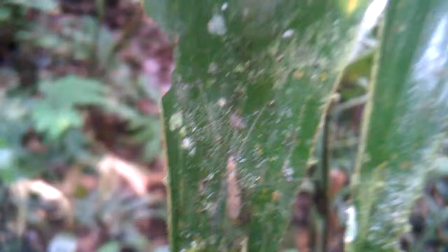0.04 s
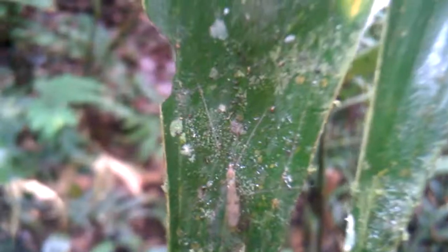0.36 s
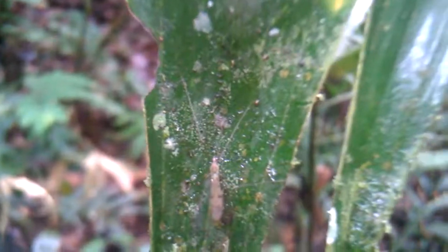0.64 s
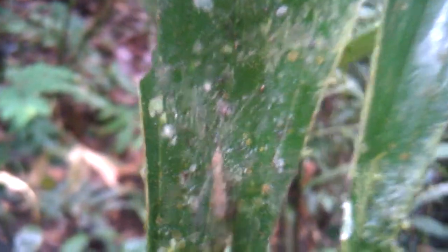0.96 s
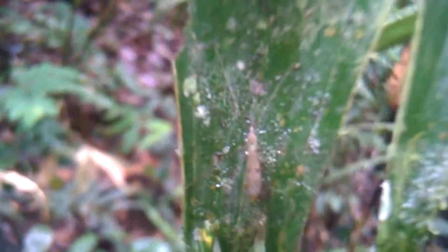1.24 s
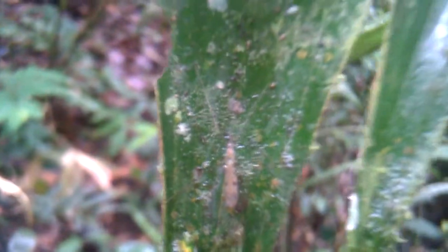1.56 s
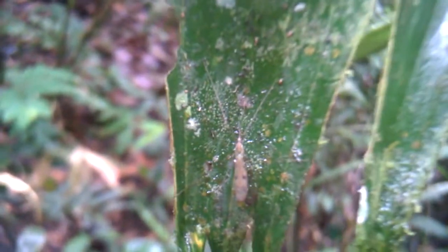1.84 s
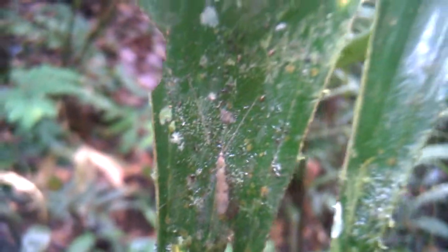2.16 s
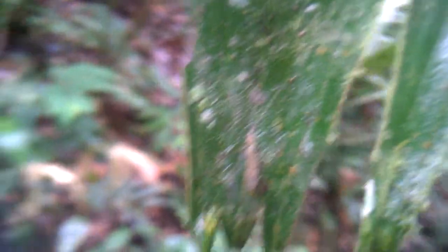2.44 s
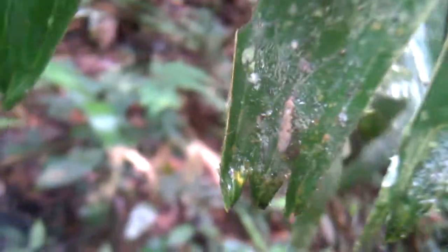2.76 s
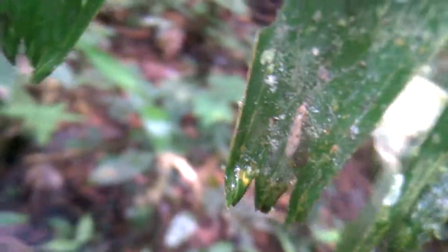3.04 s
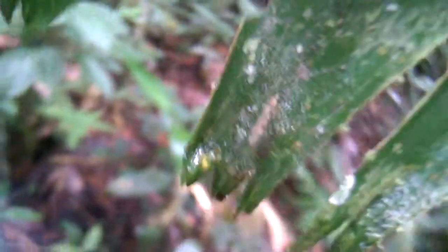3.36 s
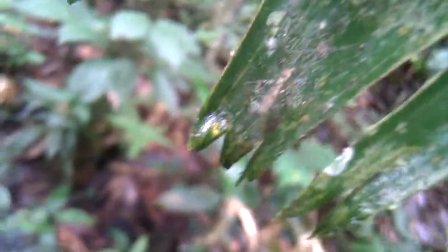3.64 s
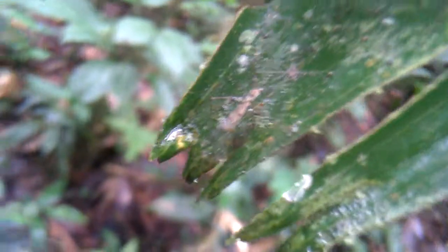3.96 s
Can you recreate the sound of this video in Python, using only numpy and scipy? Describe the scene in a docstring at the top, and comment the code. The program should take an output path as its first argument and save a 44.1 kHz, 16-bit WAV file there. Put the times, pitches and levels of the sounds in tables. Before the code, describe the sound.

Quiet forest ambience with low rumble, distant engine hum, faint insects and brief handling noises.

```python
"""Quiet forest floor, hand-held camera

A far engine hums over low rumble and a soft wash of air. Distant insects hold a shrill band
while one chirps at an even pace. Up close, the camera's plastic case rings with a single click;
later, fingers tap, rub and scrape it in puffs of stick-slip friction."""
import sys
import numpy as np
from scipy import signal
from scipy.fft import rfft, irfft
from scipy.io import wavfile

SR = 44100
rng = np.random.default_rng(int(sys.argv[2]) if len(sys.argv) > 2 else 0)


def wav_out(sig):
    """Save sig, one row per channel (or a flat mono array), as 16-bit PCM at SR to the path in sys.argv[1]."""
    wavfile.write(sys.argv[1], SR, np.round(np.clip(np.atleast_2d(sig).T, -1, 1) * 32767).astype(np.int16))


N = 176400
TIME = np.arange(N) / SR
HZ = np.fft.rfftfreq(N, 1 / SR)


def amp(db):
    """Decibels to gain."""
    return 10 ** (np.asarray(db) / 20)


def unit(x):
    """Scales to rms 1."""
    return x / np.sqrt(np.mean(x ** 2) + 1e-30)


def over_hz(points):
    """Draws a curve across the spectrum on a log-frequency axis."""
    freq_hz, value = np.transpose(points)
    return np.interp(np.log(HZ + 1), np.log(freq_hz + 1), value)


def over_time(points, column=1):
    """Reads one column of an automation curve at every sample."""
    table = np.array(points)
    return np.interp(TIME, table[:, 0], table[:, column])


def pan(side_db):
    """Stereo gains for side_db, the level of left minus right."""
    return amp(np.array([[.5], [-.5]]) * side_db)


def add(mix, start_s, sound):
    """Mixes a stereo sound in at its cue."""
    part = mix[:, max(round(start_s * SR), 0):][:, :sound.shape[1]]
    part += sound[:, :part.shape[1]]


def arch(start_s, length_s, skew=1):
    """A half-sine swell; a skew below 1 brings the peak forward."""
    return abs(np.sin(np.pi * np.clip((TIME - start_s) / length_s, 0, 1) ** skew))


def drift(rate_hz):
    """Smooth random modulation of rms 1."""
    lowpass = np.exp(-(HZ / rate_hz) ** 2) * (HZ > 0)
    return unit(irfft(rfft(rng.standard_normal(N)) * lowpass, N))


def diffuse(colour, lean=((100, 0), (1000, 0))):
    """Noise from all around: nearly mono in the bass, wide in the treble."""
    # correlation of left and right: freq_hz, correlation
    likeness = [(25, .92), (65, .97), (130, .9), (290, .82), (640, .63), (1410, .2), (3100, -.05),
                (15000, -.1)]
    same = over_hz(likeness)
    left, unrelated = rfft(rng.standard_normal((2, N)))
    right = same * left + np.sqrt(1 - same ** 2) * unrelated
    return unit(irfft(np.array([left, right]) * amp(over_hz(colour)) * pan(over_hz(lean)), N))


def click():
    """A quick run of snaps rings the plastic case, high modes dying first; leaves return a short tail."""
    # snaps within the click: start_s, gain_db
    snaps = [(1.0767, -8), (1.0775, -5.5), (1.0788, -6), (1.0797, 0.5), (1.0826, -4.5), (1.0841, -9.5)]
    # modes of the case: pitch_hz, level_db, side_db
    modes = [(310, -38.5, -2), (610, -33.5, -2), (780, -40.5, -13), (980, -47.5, -14), (2003, -34.5, -10),
             (2600, -48, 9), (3480, -43, -3), (3590, -31, -20.5), (4020, -33, -19), (6000, -42, -14),
             (8380, -49, -12), (9400, -44, -21)]
    # scatter from nearby leaves: freq_hz, gain_db
    leaf_colour = [(300, 6.5), (2000, -6), (2700, -9), (4100, 0), (5200, -16), (9800, -12), (15500, -30)]
    ring_t60_s, damping_power = .024, .45  # decay at 1 kHz, and how it quickens with pitch
    crack_db, crack_decay_s, crack_top_hz = -33.5, .00073, 7850
    tail_db, tail_t60_s = -37.5, .093
    shade_hz, case_band_hz = 8400, [252, 12300]
    t, out = np.arange(SR // 6) / SR, np.zeros((2, N))
    for start_s, gain_db in snaps:
        ring = 0
        for pitch_hz, level_db, side_db in modes:
            fall_db = 60 * t / ring_t60_s * (pitch_hz / 1000) ** damping_power
            tone = np.sin(2 * np.pi * pitch_hz * rng.normal(1, .004) * t)
            ring += tone * amp(level_db - fall_db) * pan(side_db)
        burst = rng.standard_normal((2, len(t))) * np.exp(-t / crack_decay_s)
        crack = signal.lfilter(*signal.butter(2, crack_top_hz, fs=SR), burst)
        add(out, start_s, amp(gain_db) * (ring + crack * amp(crack_db) * pan(side_db=-17)))
    loudest_s = max(snaps, key=lambda snap: snap[1])[0]
    add(out, loudest_s, diffuse(leaf_colour)[:, :len(t)] * amp(tail_db - 60 * t / tail_t60_s))
    # The case shades the left microphone from the highest treble.
    shade = signal.butter(4, shade_hz, fs=SR, output="sos")
    out[0] = signal.sosfilt(shade, signal.sosfilt(shade, out[0]))
    return signal.sosfilt(signal.butter(4, case_band_hz, "bandpass", fs=SR, output="sos"), out)


def rubs():
    """Skin sticks and slips on the case, fizzing most where the finger presses hardest."""
    # finger strokes: start_s, length_s, level_db, tilt_db_per_octave, side_db
    strokes = [(2.725, 0.16, -64, 3, -10), (2.841, 0.44, -66, 1, -7), (3.188, .12, -60.5, 0.5, -4),
               (3.234, 0.42, -62.5, 0.5, -9), (3.45, 0.94, -67.5, -2.5, -6)]
    # skin rubbing on plastic: freq_hz, gain_db
    colour = [(200, -19), (800, -7), (1500, 2.5), (2100, 4.5), (2900, -2.5), (4900, -12), (6300, -4),
              (7800, -12.5), (9000, -16.5), (15500, -35)]
    slip_rate_hz, slip_decay_s, slip_jitter, steady_friction = 130, .0022, .45, .55
    fizz_hz, fizz_power, body_power = 4470, 2.5, 1.67
    cycle = np.cumsum(slip_rate_hz * (1 + slip_jitter * drift(rate_hz=110))) / SR % 1
    slips = np.exp(-cycle / slip_rate_hz / slip_decay_s) * amp(2.4 * drift(rate_hz=80))
    friction = rfft(rng.standard_normal((2, N)) * unit(steady_friction + slips))
    lowpass = 1 / (1 + (HZ / fizz_hz) ** 6)
    out = np.zeros((2, N))
    for start_s, length_s, level_db, tilt, side_db in strokes:
        rub = unit(irfft(friction * amp(over_hz(colour) + tilt * np.log2(HZ + 1)), N))
        body = irfft(rfft(rub) * lowpass, N)
        fizz = rub - body
        press = arch(start_s, length_s, skew=.6)
        out += (body * press ** body_power + fizz * press ** fizz_power) * amp(level_db) * pan(side_db)
    return out


def touches(cues, colour, rise_s, decay_s):
    """Short dry puffs of friction on the case, each with a quick attack and an exponential decay."""
    # stereo lean of a touch: freq_hz, side_db
    lean = [(1000, -10), (2100, -18), (3500, -1), (5000, 6), (6400, -13)]
    noise = rfft(rng.standard_normal((2, N))) * amp(over_hz(colour)) * pan(over_hz(lean))
    out = np.zeros((2, N))
    for start_s, level_db, tilt in cues:
        t = np.maximum(TIME - start_s, 0)
        envelope = np.minimum(t / rise_s, 1) * np.exp(-np.maximum(t - rise_s, 0) / decay_s)
        puff = unit(irfft(noise * amp(tilt * np.log2(HZ + 1)), N))
        out += puff * envelope * amp(level_db)
    return out


def taps():
    """A fingertip ticks lightly against the case."""
    # fingertip contacts: start_s, level_db, tilt_db_per_octave
    contacts = [(2.752, -60, 1), (2.757, -61, 1), (3.009, -59.5, 4.5), (3.044, -62, 4),
                (3.2199, -39.5, -0.5)]
    # tone of a tap: freq_hz, gain_db
    colour = [(300, -8), (1000, -5), (1500, 10), (2100, -2), (2800, -21), (4900, -8), (5800, -6),
              (7500, -13), (15500, -32)]
    return touches(contacts, colour, rise_s=.00098, decay_s=.0045)


def scrape():
    """A firmly pressed finger judders over the case in a quick run of catches."""
    # catches of the skin: start_s, level_db, tilt_db_per_octave
    catches = [(3.4125, -51, -3), (3.420, -45, 1.5), (3.432, -46.5, 3), (3.443, -55, 3),
               (3.455, -50.5, -1.5), (3.466, -55, -5.5)]
    # tone of the scrape: freq_hz, gain_db
    colour = [(300, -15), (1400, -5.5), (2100, 0), (2700, -0.5), (3600, -1), (5200, -19.5), (6400, -12.5),
              (7700, -16), (8700, -24.5), (15500, -39)]
    return touches(catches, colour, rise_s=.0054, decay_s=.011)


def grip():
    """The shifting hand stirs the lowest resonance of the case."""
    # shifts of the grip: start_s, length_s, level_db
    shifts = [(0.776, 0.19, -54), (3.05, 0.58, -56.5)]
    # dull body of the case: freq_hz, gain_db
    colour = [(100, -31), (230, -11.5), (345, 2.5), (450, -6.5), (700, -10), (1500, -18.5), (15000, -97)]
    swells = sum(amp(level_db) * arch(start_s, length_s) for start_s, length_s, level_db in shifts)
    return diffuse(colour) * swells


def engine():
    """A far engine, slowing slightly; little but its firing tone carries."""
    # firing rate and loudness: time_s, pitch_hz, level_db
    running = [(.1, 82.8, -40.5), (.35, 82.8, -41), (.65, 82.8, -44), (1.0, 82.8, -44), (1.35, 82.7, -51),
               (1.55, 82.7, -38.5), (1.8, 82.3, -45), (2.15, 81.4, -50.5), (3.05, 80.6, -48),
               (3.6, 80, -55.5), (4, 80, -53.5)]
    waver_hz, waver_db, overtone_db = .5, 1.7, -30.5
    phase = 2 * np.pi * np.cumsum(over_time(running) + waver_hz * drift(rate_hz=3.7)) / SR
    tone = np.sin(phase) + amp(overtone_db) * np.sin(2 * phase)
    return unit(tone) * amp(over_time(running, column=2) + waver_db * drift(rate_hz=8.4))


def chirps():
    """One insect's throbbing note, smeared to a narrow band by the trees."""
    # the insect's calls: start_s, length_s, level_db, side_db
    calls = [(0.048, 0.23, -74, -9), (0.825, 0.17, -76.5, -10), (1.532, 0.27, -75, -6),
             (2.354, 0.19, -77, -10), (3.172, 0.25, -64, 2)]
    pitch_hz, width_hz, throb_hz, throb_depth = 6420, 83, 15, .3
    band = (1 + (2 * (HZ - pitch_hz) / width_hz) ** 2) ** -.75
    note = unit(irfft(rfft(rng.standard_normal((2, N))) * band, N))
    out = np.zeros((2, N))
    for start_s, length_s, level_db, side_db in calls:
        throb = 1 + throb_depth * np.cos(2 * np.pi * throb_hz * (TIME - start_s))
        out += note * np.sqrt(arch(start_s, length_s)) * throb * amp(level_db) * pan(side_db)
    return out


def insect_chorus():
    """Distant insects blend into a shrill, lightly flickering band."""
    # tone of the chorus: freq_hz, gain_db
    colour = [(1500, -15), (2800, -10), (3700, -10.5), (4100, -1.5), (4400, 2), (4750, -4), (5150, -18),
              (5900, -14), (6450, -7.5), (6950, -13), (7500, -27.5), (9000, -37), (15500, -33)]
    # its stereo lean: freq_hz, side_db
    lean = [(4000, 1.5), (4700, 3), (5800, 3), (6600, -4), (8000, 0), (12000, 2)]
    # its rise and fall: time_s, level_db
    levels = [(.1, -66.5), (.4, -68.5), (.95, -67.5), (1.15, -71), (1.65, -70.5), (1.95, -68), (2.55, -65),
              (3.1, -66.5), (3.6, -69), (4, -68.5)]
    flicker_db = 1.1 * drift(rate_hz=14)
    return diffuse(colour, lean) * amp(over_time(levels) + flicker_db)


def forest_air():
    """A soft wash of air, with an upper layer that dies away."""
    # body of the wash: freq_hz, gain_db
    body_colour = [(60, -29), (180, -3.5), (260, -2.5), (350, 2.5), (450, -0.5), (640, -0.5), (900, -6.5),
                   (1300, -13), (1900, -17.5), (2500, -26), (3500, -33), (5500, -32), (9000, -52),
                   (16000, -53)]
    # its rise and fall: time_s, level_db
    body_levels = [(.1, -54), (.45, -54), (.75, -55), (.89, -49.5), (1.03, -55), (1.6, -56), (2.2, -56.5),
                   (2.7, -59.5), (3.15, -58), (3.35, -66.5), (3.55, -62.5), (4, -61)]
    # upper layer: freq_hz, gain_db
    upper_colour = [(300, -15), (750, 0.5), (1250, 6), (1700, -7), (2400, -33), (6000, -42), (15000, -70)]
    # its fade: time_s, level_db
    upper_levels = [(.1, -58), (.35, -68.5), (.72, -65), (.89, -65), (1.05, -74), (1.7, -69.5), (4, -78.5)]
    # stereo lean of both: freq_hz, side_db
    lean = [(200, -0.5), (380, 0.5), (700, -5), (1200, -5.5), (1950, -7), (2400, -1.5), (2900, 10.5),
            (4000, -3.5)]
    body = diffuse(body_colour, lean) * amp(over_time(body_levels) + .28 * drift(rate_hz=17))
    upper = diffuse(upper_colour, lean) * amp(over_time(upper_levels))
    return body + upper


def rumble():
    """Lumpy low rumble on the microphone."""
    # tone of the rumble: freq_hz, gain_db
    colour = [(8, -10), (18, -13), (30, 0.5), (55, -6), (80, -10.5), (110, -17), (160, -29.5), (300, -36.5),
              (800, -83)]
    # its surges: time_s, level_db
    levels = [(.1, -46), (.7, -43.5), (.95, -37), (1.06, -45.5), (1.23, -41.5), (1.38, -48.5),
              (1.75, -43.5), (1.99, -46.5), (2.08, -36.5), (2.17, -46.5), (2.5, -47), (3.05, -46),
              (3.45, -50), (3.6, -44), (3.83, -56.5), (4, -46.5)]
    return diffuse(colour) * amp(over_time(levels) + 2 * drift(rate_hz=16.6))


def hiss(level_db=-76.5):
    """The microphone's own faint, steady noise."""
    # tone of the hiss: freq_hz, gain_db
    colour = [(7000, 1.5), (10000, -2)]
    return diffuse(colour) * amp(level_db)


def scene():
    """The forest bed, with the handling close by."""
    bed = engine() + rumble() + forest_air() + insect_chorus() + hiss() + chirps()
    return bed + click() + rubs() + taps() + scrape() + grip()


def record(dry):
    """A moment of silence, a fast fade-in and a steep high cut."""
    fade_centre_s, fade_s, cutoff_hz = .081, .014, 15750
    fade_in = np.clip((TIME - fade_centre_s) / fade_s + .5, 0, 1)
    high_cut = signal.firwin(511, cutoff_hz, window=("kaiser", 9), fs=SR)
    return signal.oaconvolve(dry * fade_in, high_cut[None], "same")


dry = scene()
out = record(dry)
wav_out(out)
```